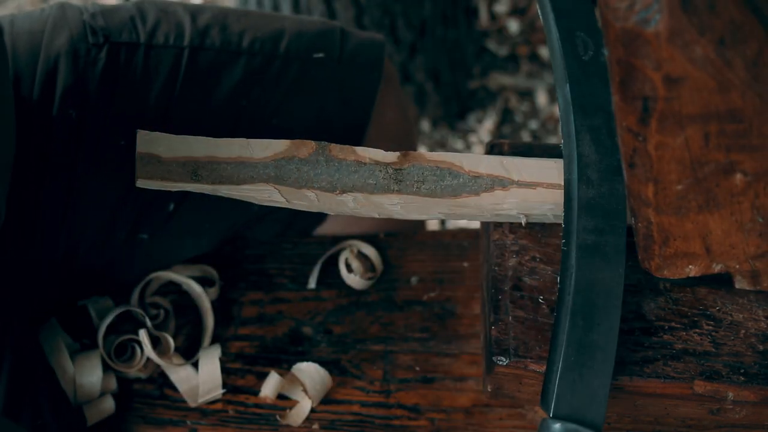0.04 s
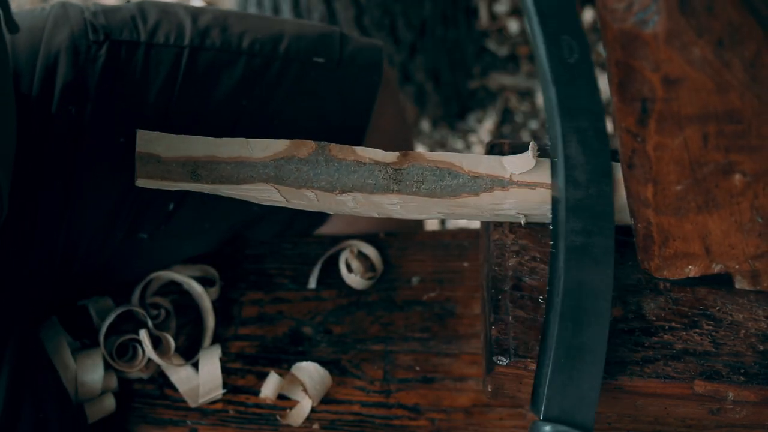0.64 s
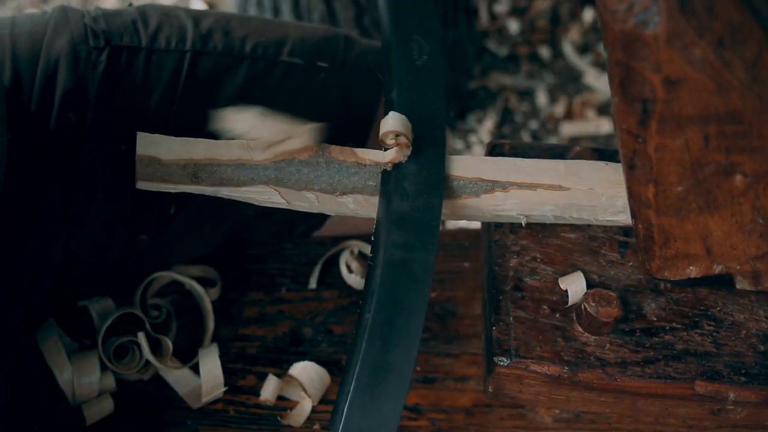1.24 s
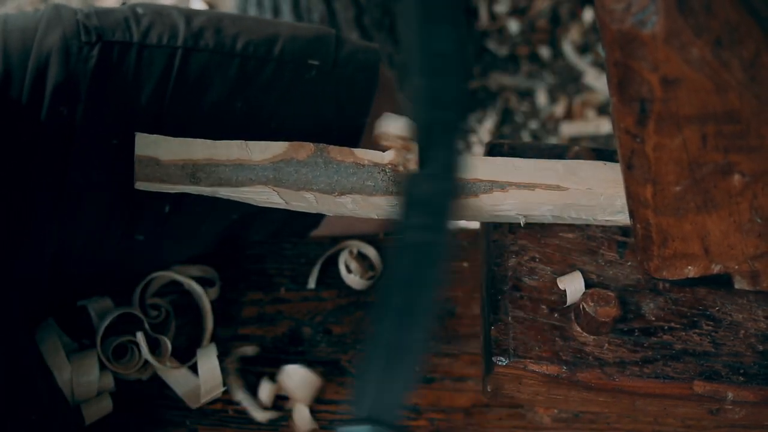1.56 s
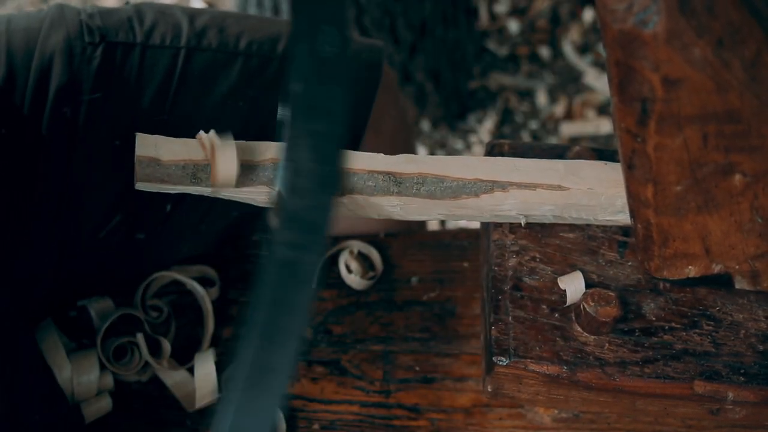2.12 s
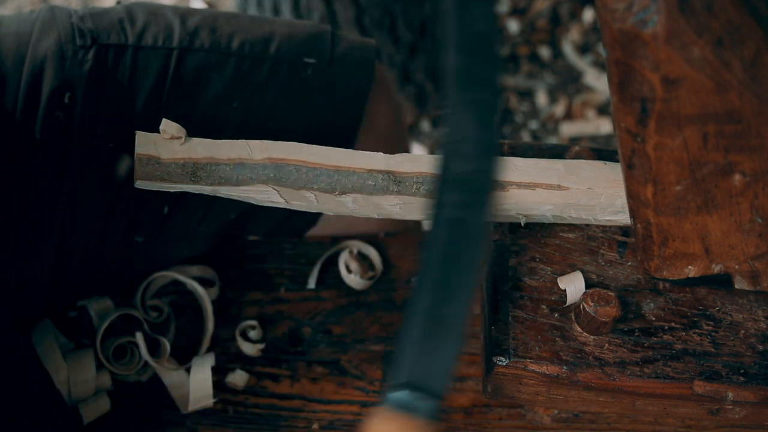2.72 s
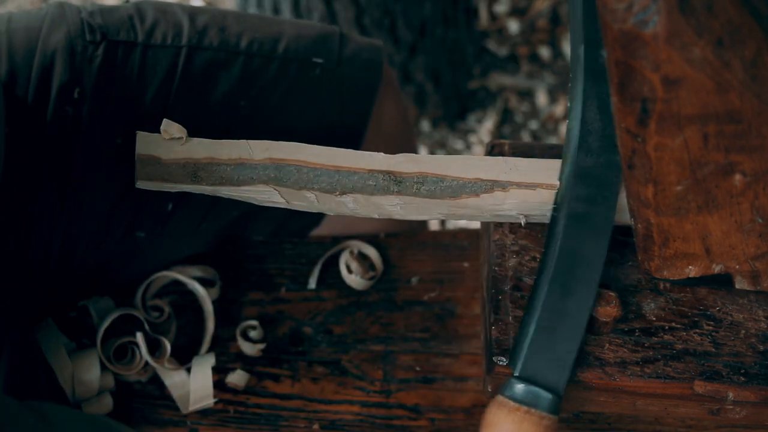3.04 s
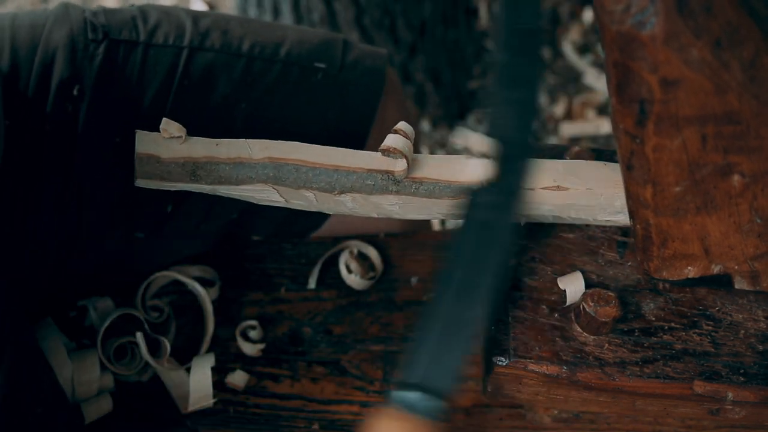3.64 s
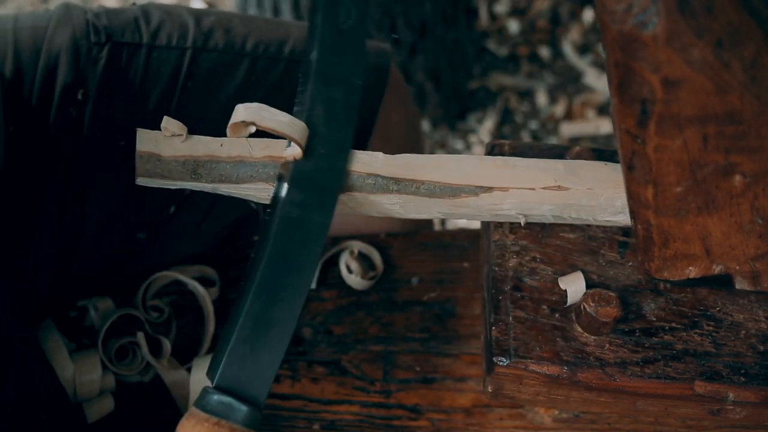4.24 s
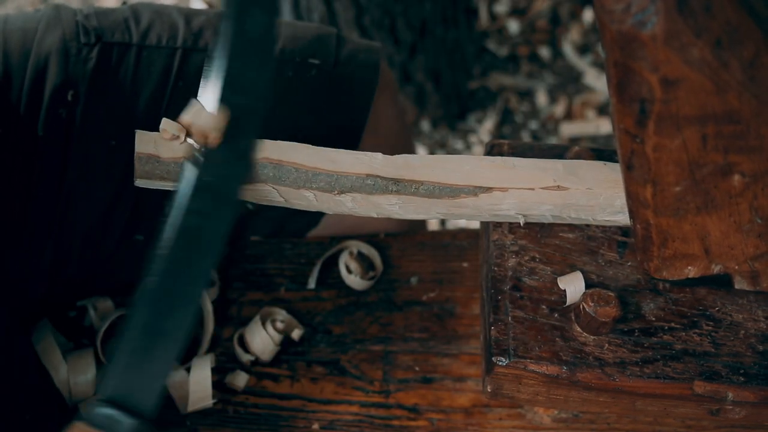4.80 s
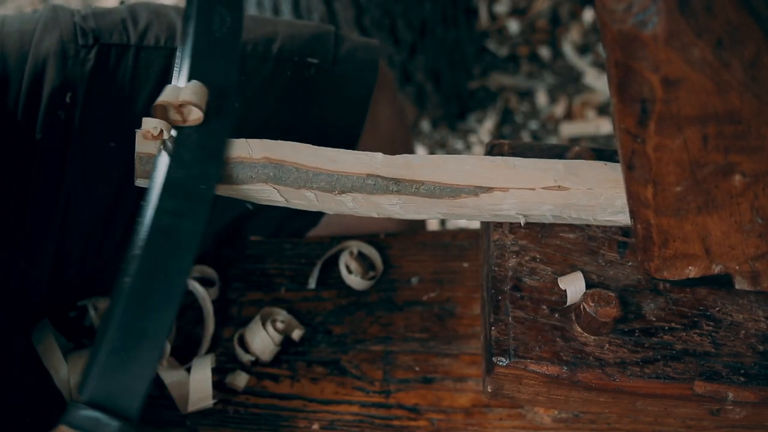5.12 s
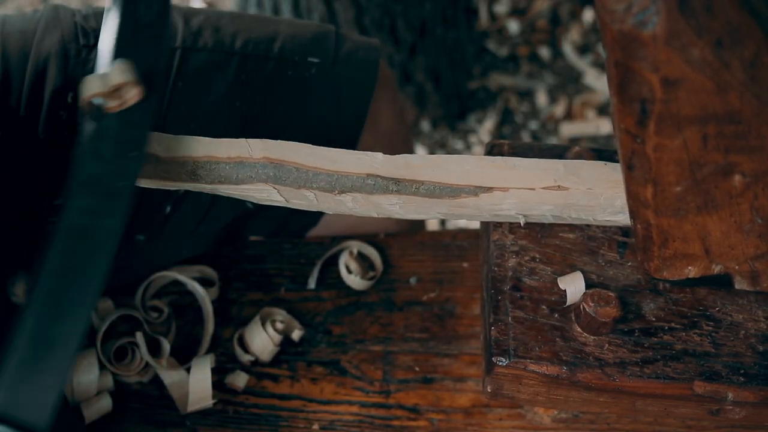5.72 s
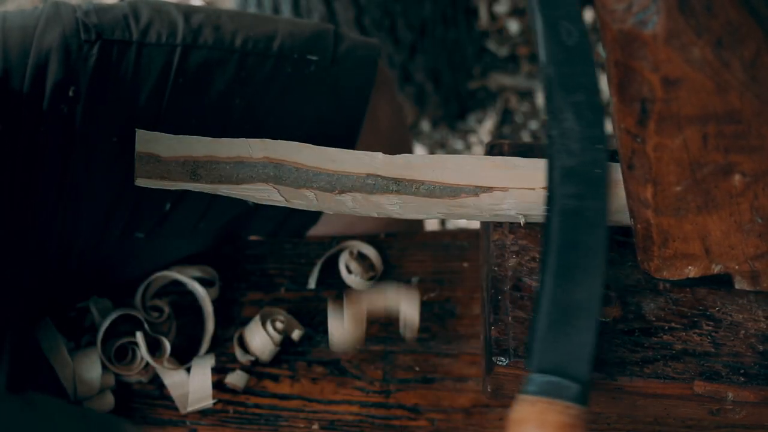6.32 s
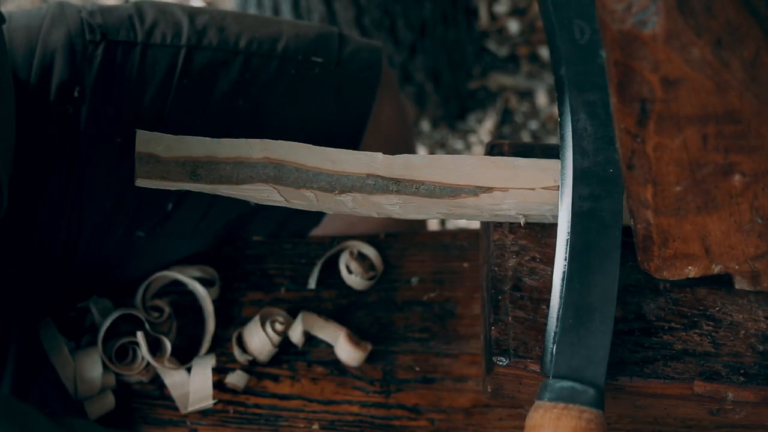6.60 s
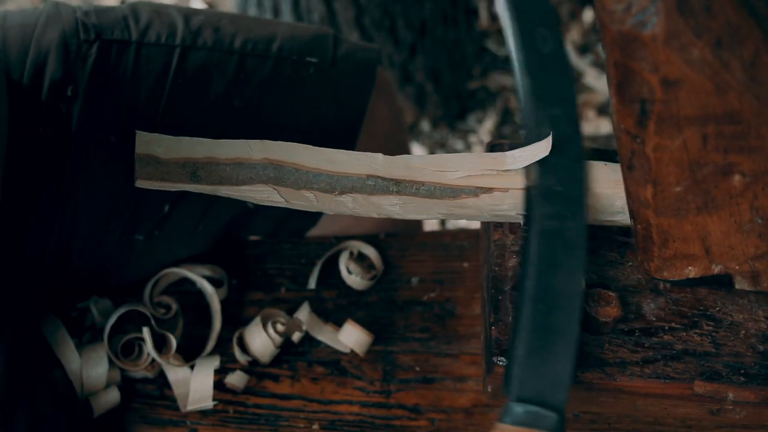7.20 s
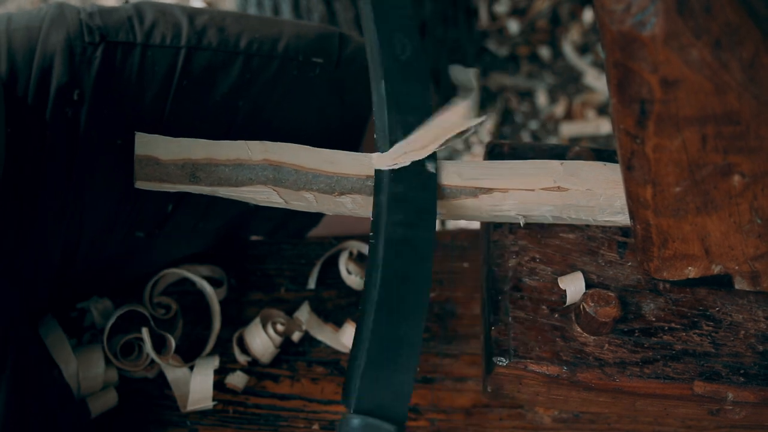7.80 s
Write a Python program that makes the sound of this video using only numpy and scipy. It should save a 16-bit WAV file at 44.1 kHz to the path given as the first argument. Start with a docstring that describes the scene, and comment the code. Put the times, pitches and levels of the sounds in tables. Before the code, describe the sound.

Close, rasping pulls of a steel blade peel shavings from wood, with sharp splintering cracks and softer rubs between strokes.

```python
"""A drawknife peels curls off a stick clamped in a wooden shaving bench, close by and outdoors.
On each pull the edge sticks and slips through the fibres: the wood rings and groans, the shaving
crackles and splits, and the steel sings thinly. Between pulls the blade rubs back over the wood.
The stick knocks in its clamp, sleeves rustle, and a faint wash of open air lies behind it all.
The loudest peaks overload and are flattened."""
import sys
import numpy as np
from scipy import signal
from scipy.fft import rfft, irfft, next_fast_len
from scipy.io import wavfile

SR = 44100
rng = np.random.default_rng(int(sys.argv[2]) if len(sys.argv) > 2 else 0)


def wav_out(sig):
    """Save sig, one row per channel (or a flat mono array), as 16-bit PCM at SR to the path in sys.argv[1]."""
    wavfile.write(sys.argv[1], SR, np.round(np.clip(np.atleast_2d(sig).T, -1, 1) * 32767).astype(np.int16))


N = 350595
TIME = np.arange(N) / SR
SIZE = next_fast_len(N + SR // 4, True)  # spare room for ringing tails
FREQS = np.fft.rfftfreq(SIZE, 1 / SR)

# One value each for scrape, load and tearing; stroke_gains explains them.
PULL_SHAPE = dict(arch_db=(4, 1.5, 10), growth=(2.2, 2.35, 2.7), stop_db_per_s=(608, 527, 641))
# Pulls of the knife. Each row: when the edge bites, run-up and length of the cut, all in seconds,
# then relative levels in dB of the scrape, the load on the bench and the tearing fibres.
PULLS = [ (0.44, 0.12, 0.14, -24, -25, -33.5), (0.863, 0.043, 0.065, -5, -10, -12),
         (1.266, 0.095, 0.059, -7, -12, -19.5), (1.657, 0.07, 0.12, -8, -13, -29),
         (2.05, 0.071, 0.084, -5, -7.5, -17.5), (2.44, 0.1, 0.084, -11.5, -22.5, -30),
         (3.268, 0.12, .1, -10.5, -12.5, -20), (3.735, 0.087, 0.14, -10.5, -11, -18.5),
         (4.212, 0.06, .14, -11.5, -12, -27.5), (4.59, 0.061, 0.074, -10.5, -12.5, -25),
         (4.847, 0.021, 0.019, -18.5, -25, -53), (4.90, .04, 0.05, -28, -41.5, -45),
         (5.159, 0.03, 0.0202, -16.5, -22, -40), (5.42, 0.09, 0.038, -25, -32, -40.5),
         (5.657, 0.062, 0.017, -21.5, -30, -35), (6.942, .05, .1, -20, -22, -20),
         (7.51, 0.073, 0.063, -17.5, -24, -17.5), (7.87, 0.052, 0.052, -17, -25.5, -17), ]

def pulls(bench, stick, fibres, grit_db=-3, fizz_db=-3, tuft_db=-2, deep_cut_db=-25):
    """The edge chatters through the grain; each slip shakes the wood and snaps fibres."""
    scrape, load, tearing = stroke_gains(PULLS, **PULL_SHAPE)
    chatter = slips(rate_hz=330, jitter=.45, spread_db=3)
    force = moving_contact(unit(chatter - chatter.mean()) + undb(grit_db) * rng.standard_normal(N))
    # now and then a whole tuft snaps
    tufts = undb(tuft_db) * unit(tail(slips(rate_hz=70, jitter=0.81, spread_db=6), decay_s=.0012))
    snaps = (unit(tail(chatter, decay_s=.0012)) + tufts + undb(fizz_db)) * rng.standard_normal(N)
    # a shallow cut rasps brightly; a deep one leans on the stick's strong mode and on the bench
    depth = load / (load + undb(deep_cut_db))
    shallow_tone = colour([(800, 1.5), (1080, -1.5), (1500, 4), (2500, 7.5), (4700, -1), (9000, 1.5)])
    deep_tone = colour([(800, 1.5), (1050, 1.5), (1500, 1), (2500, -6.5), (5000, 1)])
    bench_tone = colour([(170, -6.5), (310, -0.5), (450, 5), (700, -0.5)])
    shallow = unit(through(force, stick * shallow_tone))
    deep = unit(through(force, stick * deep_tone))
    heave = unit(through(force, bench * bench_tone))
    rasp = scrape * (depth * deep + (1 - depth) * shallow)
    crackle = tearing * unit(through(snaps, fibres))
    return undb(-0.5) * (rasp + crackle) + undb(-3) * load * heave

def moving_contact(force, reflection=0.68, round_trip_s=0.001235, travel=0.22):
    """Waves bounce back from the end of the stick; their delay wanders as the blade moves."""
    delay_s = round_trip_s * (1 + travel * walk(14))
    return force + reflection * np.interp(TIME - delay_s, TIME, force)

def stroke_gains(strokes, arch_db, growth, stop_db_per_s):
    """One loudness curve per dB column: a stroke runs up, is fastest midway and stops quickly."""
    out = np.zeros((len(arch_db), N))
    for start_s, run_up_s, length_s, *levels_db in strokes:
        near = (TIME > start_s - run_up_s) & (TIME < start_s + length_s + 60 / min(stop_db_per_s))
        t = TIME[near] - start_s
        run_up = np.clip(1 + t / run_up_s, 0, 1)
        slowness = 1 - np.sin(np.pi * np.clip(t / length_s, 0, 1))  # 1 at the ends, 0 midway
        stopped_s = np.maximum(t - length_s, 0)
        for k, db in enumerate(levels_db):
            drop_db = arch_db[k] * slowness + stop_db_per_s[k] * stopped_s
            out[k, near] += run_up ** growth[k] * undb(db - drop_db)
    return out

# Modes, the pitches at which bench and stick ring. Each row: pitch in Hz, width in Hz before
# damping (wider dies sooner), relative level in dB.
WOOD_MODES = [(179, 34, 2.5), (271.5, 8.7, -25), (309, 53, 6.5), (398, 43, -4.5), (566, 190, 2.5),
              (630, 15.4, 3.5), (700, 32, -13.5), (814, 10, 1.5), (929, 83, 1), (991, 13, 5.5),
              (1060.6, 55.5, 12.5), (1110, 45, -27), (1220, 35, -4.5), (1384, 27.5, 4.5), (1473.5, 39, 6.5),
              (1540, 20, -33), (1853, 58, -11.5), (2023, 15.5, 0), (2263, 46, -11), (2840, 260, -10.5),
              (3185, 290, -5.5), (3306, 120, -10.5), (4080, 140, -12.5)]

def wood_response(damping, bench_top_hz=730):
    """How the low bench modes and the higher stick modes ring; the grip sets their damping."""
    bench = stick = 0
    for hz, width, db in WOOD_MODES:
        if hz < bench_top_hz:
            bench = bench + undb(db) * mode(hz, width * damping)
        else:
            stick = stick + undb(db) * mode(hz, width * damping)
    # a narrow bench gives off little bass
    radiation = colour([(30, -21.5), (110, -14.5), (170, -9), (260, 6), (5000, -7.5), (12000, -12)])
    return bench * radiation, stick * radiation

def dense_modes(share, decay_s):
    """Countless weak overlapping modes: a direct click followed by a short noisy ring."""
    ring = rng.standard_normal(N) * np.exp(-TIME / decay_s)
    treble = signal.sosfilt(signal.butter(2, 2500, "high", fs=SR, output="sos"), ring)
    return 1 + share * rfft(treble / np.sqrt(np.sum(treble ** 2)), SIZE)

# The tone of tearing fibres. Each row: frequency in Hz, relative level in dB.
FIBRE_TONE = [(800, -19), (2000, -15), (3300, -18), (3800, -9.5), (5500, -7), (7200, -4), (8100, -2.5),
              (8800, -6), (9600, -5.5), (10700, -4.5), (12500, -14), (16000, -15)]

def fibre_response(steel):
    """Fibres tear brightly, and the blade rings along with them."""
    return colour(FIBRE_TONE) * (1 + undb(1) * steel)

# Splinters break and chips land. Each row: start in seconds, relative level in dB,
# length in seconds, ring of the wood in dB compared with the crack.
SPLITS = [(0.39, -49, 0.009, 23.5), (0.520, -14.5, 0.0092, 3), (0.544, -27.5, 0.0035, 8),
          (0.863, 4, 0.0042, 3), (0.882, 1.5, 0.01, -14), (0.944, -22.5, 0.0019, 16.5),
          (1.295, -3.5, 0.0085, -7), (1.335, -18, 0.015, -26), (1.488, -24, 0.00073, -8),
          (1.717, -5, .0105, -14), (1.734, -6, 0.01, -5), (2.105, -15, 0.012, 9.5),
          (2.707, -28.5, 0.0018, -31), (4.271, -8, .01, -20), (4.297, -9, 0.014, -25),
          (4.668, -20.5, 0.0046, -10), (5.906, -36, 0.0014, -14), (5.924, -42, .0025, 9),
          (6.116, -43, 0.0064, 15), (6.146, -41, 0.0035, 12), (6.515, -32.5, .006, 13.5),
          (6.64, -47.5, .0065, 11.5), (6.866, -17.5, 0.0083, 8), (6.947, -4, 0.0021, -20),
          (6.949, -11, .0014, -14), (6.988, -0.5, 0.01, -5), (7.001, -3, 0.014, -16),
          (7.109, -29, .0035, -12), (7.551, -10.5, 0.011, -8.5), (7.817, -22, 0.023, -10.5),
          (7.893, -6.5, .006, -7), (7.925, -10, 0.0032, -5.5)]

def splits(wood, fibres, crack_db=-3, ragged_db=5.5, release_s=.0013):
    """A crack runs along the grain: a short, bright burst that also jolts the wood."""
    crack, jolt = np.zeros(N), np.zeros(N)
    t = np.arange(SR // 10) / SR
    for start_s, db, length_s, ring_db in SPLITS:
        start = int(start_s * SR)
        burst = (undb(db + crack_db) * np.exp(-np.maximum(t - length_s, 0) / release_s))[:N - start]
        crack[start:start + len(burst)] += burst
        jolt[start:start + len(burst)] += undb(ring_db) * burst
    grain = unit(rng.standard_normal(N) * undb(ragged_db * walk(1500)))
    sharp_wood = wood * colour([(200, -15.5), (1000, -3), (3500, 7), (9000, 7)])
    return through(crack * grain, unit(fibres)) + through(jolt * grain, unit(sharp_wood))

# The tone of steel rubbing on wood. Each row: frequency in Hz, relative level in dB.
RUB_TONE = [(100, -10.5), (180, 9), (310, -4.5), (580, 4.5), (1080, -6), (1420, 0), (1560, 4.5), (2100, -1),
            (5000, -3.5), (12000, -4)]
# The blade slides back. Each row: when it settles, run-up and length of the slide, all in seconds,
# then relative levels in dB of the rubbing and the load on the bench.
RETURNS = [ (0.69, 0.029, 0.11, -38.5, -41), (1.015, 0.031, 0.12, -30, -26),
           (1.475, 0.068, 0.085, -28.5, -24), (1.845, 0.02, 0.12, -31.5, -23),
           (2.262, 0.018, .085, -33, -24.5), (2.73, 0.022, .14, -35.5, -27),
           (2.92, 0.065, 0.12, -38, -43.5), (3.525, 0.089, .08, -22, -26.5),
           (4.04, 0.067, 0.065, -22.5, -26), (4.44, 0.11, .09, -31.5, -30), (4.725, .04, 0.063, -38, -41),
           (6.76, 0.018, 0.18, -36.5, -44), (6.875, 0.017, .04, -24.5, -37),
           (7.21, 0.069, 0.11, -38.5, -47), (7.695, 0.08, 0.089, -34, -50.5), ]

def returns(bench, stick, patchy_db=1.5):
    """The flat of the blade rubs back over the fresh cuts, ringing the same wood more softly."""
    rubbing, load = stroke_gains(RETURNS, arch_db=(4, 0.5), growth=(1.23, 0.75),
                                 stop_db_per_s=(313, 172))
    judder = slips(rate_hz=810, jitter=0.49, spread_db=1)
    force = through((judder - judder.mean()) * undb(patchy_db * walk(59)), colour(RUB_TONE))
    rub = undb(-1.5) * rubbing * unit(through(force, stick))
    return rub + undb(-6) * load * unit(through(force, bench))

# The edge catches and sings. Each row: middle in seconds, half length in seconds,
# pitch in Hz, level in dB.
SQUEAKS = [(1.312, 0.049, 1066, -14.5), (1.673, 0.05, 1018, -10), (2.087, 0.054, 318.6, -4.5),
           (2.452, 0.024, 2067, -20.5), (2.454, 0.065, 4960, -24.5), (2.467, 0.011, 1500, -15.5),
           (2.51, 0.061, 999, -18.5), (4.855, 0.0087, 1500, -14.5)]

def groans_and_squeaks(groan_hz=306.2, hz_per_load_db=0.83, pull_db=-9.5, return_db=-4.5):
    """Nearly regular sticking and slipping makes a low groan on every stroke and a few squeaks."""
    out = np.zeros(N)
    drift = 1 + 0.02167 * walk(120)
    shimmer = undb(2 * walk(140))
    # the same small unevenness in time roughens a high squeak more than a low groan
    clock = np.cumsum(drift) / SR + .000055 * walk(900)
    groans = []
    for strokes, groan_db in ((PULLS, pull_db), (RETURNS, return_db)):
        for start_s, _, length_s, _, load_db, *_ in strokes:
            hz = groan_hz + hz_per_load_db * load_db
            groans.append((start_s + length_s / 2, 0.77 * length_s, hz, load_db + groan_db))
    for middle_s, half_s, hz, db in groans + list(SQUEAKS):
        near = np.abs(TIME - middle_s) < half_s
        phase = 2 * np.pi * hz * (clock[near] - middle_s)
        swell = np.cos(np.pi / 2 * (TIME[near] - middle_s) / half_s) ** 2
        # a light touch on a low note keeps more of the octave above
        octave = undb(-0.45 * (db + 31.5)) / (1 + (hz / 700) ** 4)
        out[near] += undb(db) * swell * (np.sin(phase) + octave * np.sin(2 * phase))
    return np.sqrt(2) * shimmer * out

# The stick knocks in its clamp. Each row: start in seconds, peak level in dB,
# treble cutoff in Hz (higher for a harder contact).
KNOCKS = [(0.392, -17.5, 2400), (0.546, -7, 560), (1.612, -12, 2000), (1.655, -13, 1800),
          (2.258, -19.5, 650), (2.478, -7.5, 610), (2.568, -16, 650), (2.604, -28, 480), (2.714, -10, 560),
          (2.819, -22.5, 700), (3.057, -1, 1020), (3.69, -19, 1600), (3.839, -2, 1400), (3.942, -23, 700),
          (4.209, -11, 1400), (4.554, -14, 1400), (4.797, -22, 600), (4.976, -27.5, 500),
          (5.079, -28.5, 450), (5.285, -27.5, 560), (5.356, -28.5, 450), (5.603, -16, 1000),
          (5.656, -17, 1500), (5.861, -33, 1200), (6.260, -27, 2200), (6.411, -24.5, 276),
          (6.505, -3.5, 894), (6.509, -4, 475), (6.524, -21, 596), (6.733, -20.5, 700), (7.682, -20, 550)]

def knocks(wood, rattle=0.2, rattle_s=0.0072, tick=.006, samples=8192):
    """A blunt push, a small tick and a brief rattle; softer contacts leave the high modes quiet."""
    out = np.zeros(N + samples)
    t = np.arange(samples) / SR
    # the place of the blow, at the clamp, decides which modes ring most
    at_clamp = colour([(160, -5), (260, -2), (400, 0.5), (500, 0.5), (620, 8), (830, 8),
                       (1100, -4.5), (1800, 7)])
    ring = irfft(wood * at_clamp, SIZE)[:samples]
    for start_s, db, cutoff_hz in KNOCKS:
        contact = (t == 0) + rattle * rng.standard_normal(samples) * np.exp(-t / rattle_s)
        push = signal.sosfilt(signal.butter(2, cutoff_hz, fs=SR, output="sos"), contact)
        blow = signal.fftconvolve(push + tick * contact, ring)[:samples]
        start = int(start_s * SR)
        out[start:start + samples] += undb(db) * blow / np.abs(blow).max()
    return out[:N]

# High modes of the blade. Each row: pitch in Hz, width in Hz, relative level in dB.
BLADE_MODES = [(3120, 130, -4), (3370, 140, -4), (4508, 60, 0), (5055, 60, 1), (7702, 60, -3),
               (8420, 90, 0), (8650, 90, -1), (8920, 90, 0), (9200, 90, 0), (10316, 110, -4)]

def steel_response():
    """The steel blade rings at several high pitches at once."""
    return sum(undb(db) * mode(hz, width) for hz, width, db in BLADE_MODES)

def blade_ring(steel, ring_db=-26, growth=0.71):
    """The steel sings as the edge scrapes; this grows slowly with force, so light cuts show it most."""
    scrape = stroke_gains(PULLS, **PULL_SHAPE)[0]
    tone = colour([(3200, 1), (4500, 7.5), (5000, 6), (7700, -1), (9300, -8)])
    sing = unit(through(rng.standard_normal(N), steel * tone))
    return undb(ring_db) * scrape ** growth * sing

# The tone of jacket cloth. Each row: frequency in Hz, relative level in dB.
CLOTH_TONE = [(200, -12), (600, -5), (1500, 2.5), (3000, -2), (6000, -5.5), (8500, -6.5), (10500, -11.5),
              (13000, -20), (16000, -40)]
# Longer reaches of the arms. Each row: middle in seconds, half length in seconds, level in dB.
REACHES = [(0.03, 0.067, -52.5), (2.88, 0.16, -42.5), (5.02, 0.18, -47.5), (5.95, 0.72, -52.5),
           (6.33, 0.26, -48), (7.25, 0.16, -49.5)]

def sleeves(rest_db=-52, swing_db=-47.5, swing_half_s=0.094, flutter_db=2, crinkle=0.081):
    """Cloth brushes and crinkles, louder as the arms swing forward on each return or reach further."""
    swings = [(start_s + length_s / 2, swing_half_s, swing_db) for start_s, _, length_s, *_ in RETURNS]
    power = undb(rest_db) ** 2
    for middle_s, half_s, db in swings + list(REACHES):
        power = power + undb(db) ** 2 * np.exp(-((TIME - middle_s) / half_s) ** 4)
    creases = unit(tail(slips(rate_hz=24, jitter=0.96, spread_db=4.5), decay_s=0.0022))
    brush = unit(through((2 + crinkle * creases) * rng.standard_normal(N), colour(CLOTH_TONE)))
    return brush * np.sqrt(power) * undb(flutter_db * walk(60))

# The tone of the open air. Each row: frequency in Hz, relative level in dB.
AIR_TONE = [(25, -32), (90, -39), (170, -8.5), (300, 4), (420, 5), (600, 5), (850, 2.5), (1300, -6),
            (1900, -2.5), (3000, -11), (7500, -23), (16000, -32)]

def open_air(level_db=-49.5):
    """The faint, gently swaying wash of the outdoors."""
    sway_db = 0.7 * walk(2)
    return unit(through(rng.standard_normal(N), colour(AIR_TONE))) * undb(level_db + sway_db)

def undb(db):
    """Turn decibels into a factor to multiply by."""
    return 10 ** (np.asarray(db) / 20)

def unit(x):
    """Scale a signal or a response to an average power of one."""
    return x / np.sqrt(np.mean(np.abs(x) ** 2))

def colour(points):
    """A tone filter drawn through (Hz, dB) points."""
    hz, db = np.transpose(points)
    cepstrum = irfft(np.log(undb(np.interp(np.log(FREQS + 1), np.log(hz), db))), SIZE)
    # fold it so that the filter never rings before the sound arrives
    cepstrum[1:SIZE // 2] *= 2
    cepstrum[SIZE // 2 + 1:] = 0
    return np.exp(rfft(cepstrum))

def mode(hz, width):
    """A filter that rings at one pitch, with a gain of one there."""
    return 1j * FREQS * width / (hz ** 2 - FREQS ** 2 + 1j * FREQS * width)

def through(x, response):
    """Pass a signal through a filter."""
    return irfft(rfft(x, SIZE) * response, SIZE)[:N]

def walk(rate_hz):
    """A smooth random wander with a spread of one."""
    return unit(np.interp(TIME * rate_hz, np.arange(N), rng.standard_normal(N)))

def tail(x, decay_s):
    """Give every pulse a fading tail."""
    return signal.lfilter([1], [1, -np.exp(-1 / (decay_s * SR))], x)

def slips(rate_hz, jitter, spread_db):
    """Pulses of uneven spacing and size, from a surface that sticks and lets go."""
    chance = rng.standard_normal((N // 10, 2))
    at = (np.cumsum(np.exp(jitter * chance[:, 0])) * SR / rate_hz).astype(int)
    size = undb(spread_db * np.clip(chance[:, 1], -2, 2))
    return np.bincount(at[at < N], size[at < N], N)

def scene():
    """Add the knife work, the sleeves and the air into one channel."""
    steel = steel_response()
    overtones = dense_modes(share=.42, decay_s=.004)
    bench, stick = wood_response(damping=1)
    # the blade rings along with the stick
    stick = (stick + undb(-16.5) * steel * colour([(5000, -9), (9000, -3.5)])) * overtones
    fibres = fibre_response(steel) * overtones
    # pressed hard in the clamp, the wood damps blows quickly
    struck = sum(wood_response(damping=1.48))
    strokes = pulls(bench, stick, fibres) + returns(bench, stick) + groans_and_squeaks()
    blows = knocks(struck) + splits(struck, fibres)
    return (strokes + blows + blade_ring(steel) + sleeves() + open_air())[None]

def record(dry):
    """Flatten the peaks at full scale and cut the treble above 15850 Hz."""
    clipped = dry / (1 + dry ** 8) ** (1 / 8)
    return signal.sosfilt(signal.ellip(12, .2, 80, 15850, fs=SR, output="sos"), clipped)

dry = scene()
out = record(dry)
wav_out(out)
```